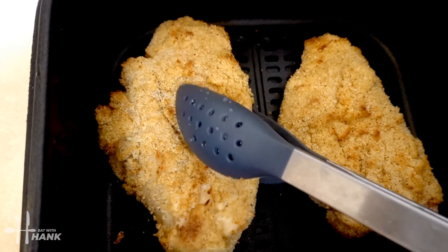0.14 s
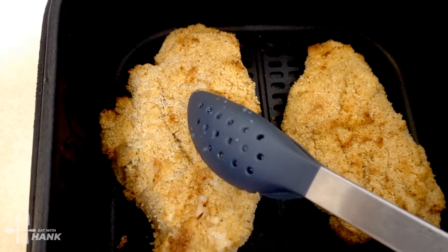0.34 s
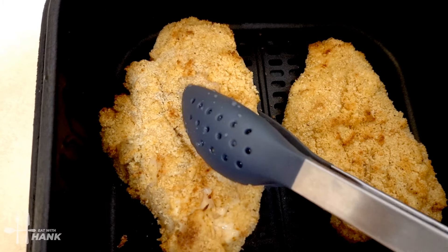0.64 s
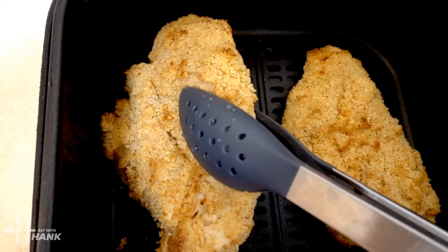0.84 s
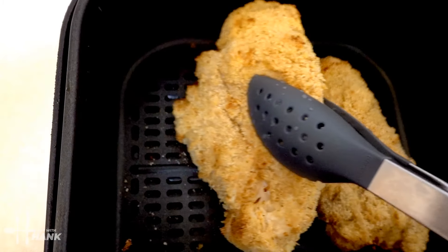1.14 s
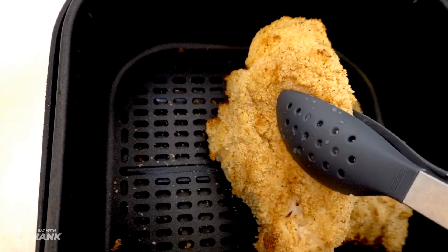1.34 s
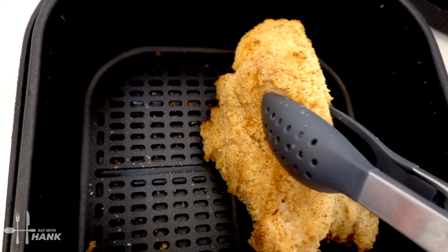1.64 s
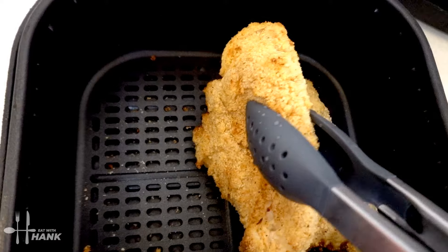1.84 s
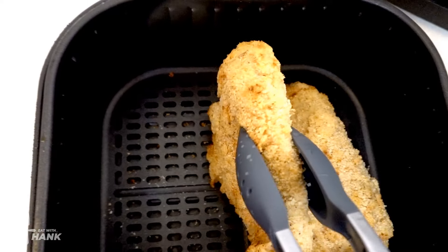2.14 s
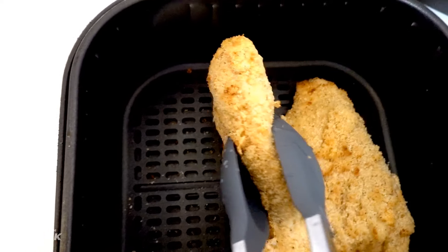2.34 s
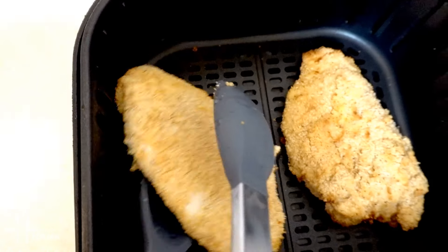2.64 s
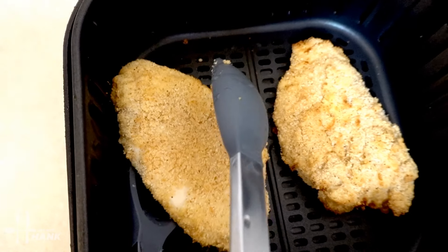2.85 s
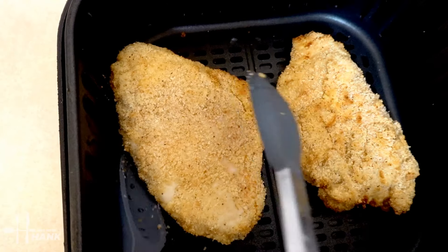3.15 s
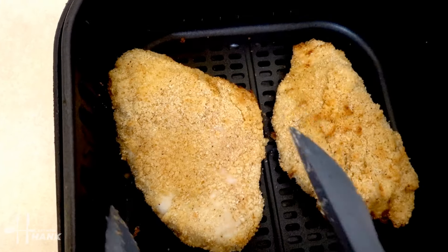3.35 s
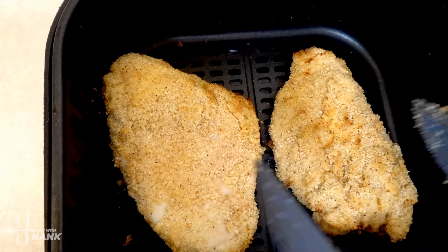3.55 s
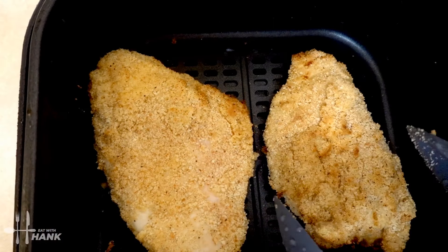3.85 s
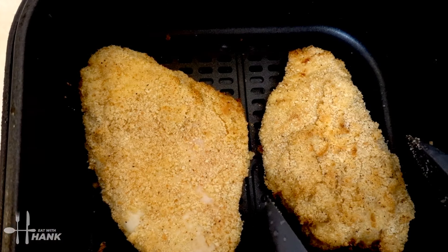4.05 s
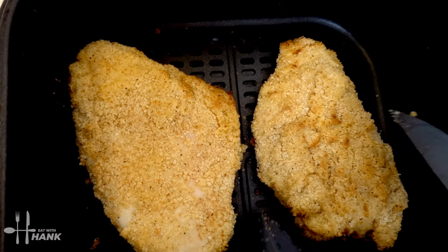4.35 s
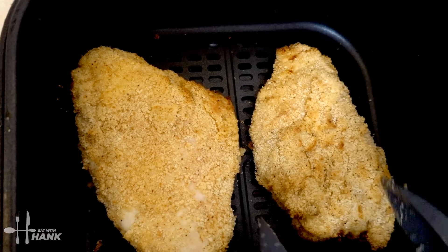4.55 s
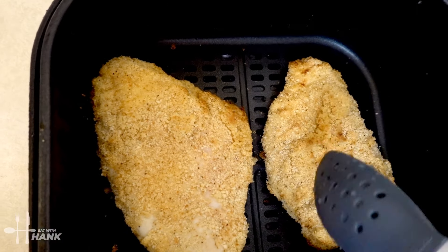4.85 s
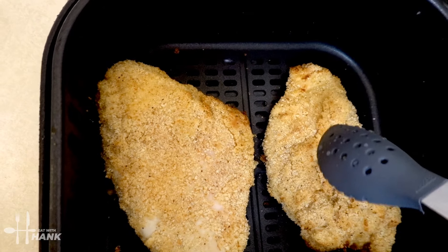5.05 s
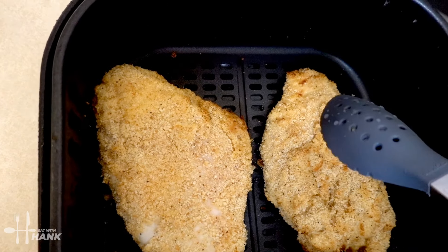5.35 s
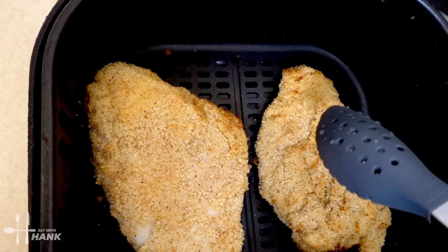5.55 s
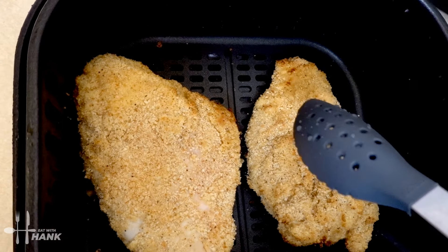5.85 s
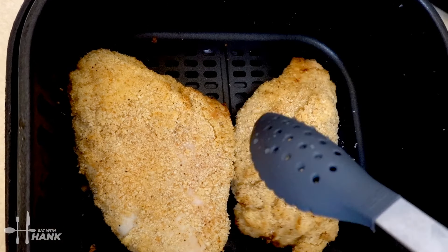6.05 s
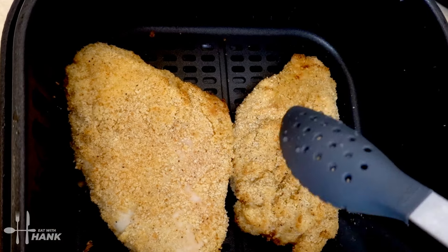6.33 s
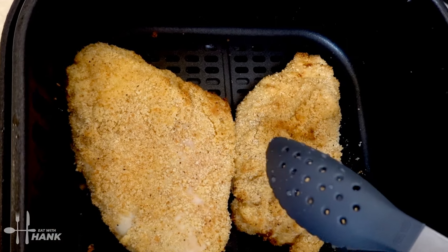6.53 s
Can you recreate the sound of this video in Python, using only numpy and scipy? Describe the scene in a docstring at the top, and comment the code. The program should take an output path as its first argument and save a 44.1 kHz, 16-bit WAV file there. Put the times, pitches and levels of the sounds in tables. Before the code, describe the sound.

Crunchy breaded meat slides over a metal grate and drops with a crack, then dull thuds, dry tong ticks and a short scraping drag.

```python
"""Breaded chicken is slid, lifted and flipped in an air fryer basket by silicone-tipped tongs, close by.
Bursts of tiny fractures make the crumbs crackle; the same kind of slips ring the grate and drag the silicone.
Knocks are short shaped noise, thuds, bumps and ticks are struck modes, and echoes add basket and kitchen.
A soft rustle of noise puffs sets in while the hand changes its grip; room air and a faint hum lie behind."""
import sys
import numpy as np
from scipy import signal
from scipy.fft import rfft, irfft
from scipy.io import wavfile
from scipy.ndimage import uniform_filter1d

SR = 44100
rng = np.random.default_rng(int(sys.argv[2]) if len(sys.argv) > 2 else 0)


def digitize_waveform(pressure):
    """Quantize a signal to 16-bit integers and store it at the path in sys.argv[1].

    Rows of a 2-D input are taken as channels; values are limited to [-1, 1].
    """
    field = np.atleast_2d(pressure).T
    bounded = np.clip(field, -1, 1)
    quanta = np.round(bounded * 32767).astype(np.int16)
    wavfile.write(sys.argv[1], SR, quanta)


N = 295029
T = np.arange(N) / SR  # time in seconds

# Strokes of the tongs and the meat.
# Each row: start in seconds, length in seconds, then three relative levels in dB:
# crumb crackle, scrape on the grate, rumble of shifting weight.
STROKES = [(.05, 0.013, -52, -50.5, -50.5), (.28, 0.13, -72, -70, -71.5), (.525, 0.027, -61.5, -58.5, -64),
           (.62, 0.38, -69, -67, -66), (1.0, .06, -70.5, -56, -74), (1.1, 0.15, -67, -52, -76),
           (1.56, 0.11, -79, -75, -65), (1.68, .2, -73.5, -77.5, -65.5), (1.95, 0.42, -84, -79, -71),
           (2.45, .13, -71.5, -68.5, -66.5), (2.695, 0.019, -51, -46, -60.5), (2.77, 0.085, -55, -53, -74),
           (2.865, .125, -51, -46, -64), (3.075, 0.0083, -59, -45.5, -49), (3.16, 0.078, -75, -80, -64),
           (5.6, 0.071, -63.5, -56, -61.5), (5.72, 0.066, -68, -61.5, -62.5), (5.99, 0.11, -57.5, -54, -82),
           (6.115, 0.085, -61, -43.5, -66), (6.325, 0.042, -75, -54.5, -54), (6.49, 0.045, -60, -55.5, -61)]
CRACKLE, SCRAPE, RUMBLE = 2, 3, 4  # which column of a stroke to play
STROKE_RISE_DB_PER_S, STROKE_FALL_DB_PER_S = 226, 240


def stroke_strength(column, fall_db_per_s=STROKE_FALL_DB_PER_S):
    """Each stroke builds up before its start, holds for its length, then dies away."""
    return gestures(STROKES, STROKE_RISE_DB_PER_S, fall_db_per_s, column)


# Crust snapping. Each row: start in seconds, relative level in dB, fading time (to 37 %) in seconds.
SNAPS = [(0.075, -40, 0.0037), (0.265, -48, 0.0017), (0.432, -45, 0.00091), (0.515, -47, 0.0022),
         (1.514, -56, 0.0063), (2.165, -56, 0.0039), (2.616, -42.5, 0.0051), (2.744, -25, 0.0035),
         (2.852, -34.5, 0.0023), (2.889, -41, 0.001), (2.982, -37, 0.0029), (3.072, -37.5, 0.0076),
         (5.19, -41, 0.0017), (5.533, -37, 0.00071)]
# Colour of the crackle. Each row: frequency in Hz, relative level in dB.
CRUMB_COLOUR = [(40, -40.5), (200, -7.5), (600, -1.5), (900, 5.5), (1400, 0.5), (2000, -4.5), (3300, 4.5),
                (4800, 4), (6300, 4), (10500, -1.5), (12800, -14.5), (15000, -15)]


def crumbs(effort):
    """Breading crackles under each stroke; now and then a piece of crust snaps."""
    crackle = grains(per_s=6000, spread_db=4.3, clump_db=3.2, clump_s=0.006)
    drive = crackle * effort * amp(6.5)
    t = T[:SR // 8]
    for start, db, fade_s in SNAPS:
        add(drive, start, amp(db) * np.exp(-t / fade_s) * rng.standard_normal(len(t)))
    tone = colour(CRUMB_COLOUR)
    return convolve(drive, tone / np.linalg.norm(tone))


def pops(effort):
    """Single crumbs break with a crisp pop, more loudly under a firm stroke."""
    breaks = grains(per_s=30, spread_db=3, clump_db=0, clump_s=1)
    return passed(breaks, 1500, "high") * effort * amp(3)


# Ringing of the grate.
# Each row: pitch in Hz, width in Hz (doubled in each of two passes), relative level in dB.
GRATE_RINGS = [(2450, 720, 2), (2500, 200, 6.5), (2734, 150, -3.5), (2910, 130, -2), (3155, 410, -9)]


def scrape():
    """Small slips ring the grate."""
    slips = grains(per_s=3000, spread_db=1.3, clump_db=3.8, clump_s=0.014)
    rung = np.zeros(N)
    for hz, width, db in GRATE_RINGS:
        rung += amp(db) * resonate_twice(slips, hz, 2 * width)
    return amp(1.5) * evened(rung) * stroke_strength(SCRAPE)


# Silicone dragging on the coating.
# Each row: start in seconds, length in seconds, final level in dB, swell in dB (a negative one fades),
# pitch in Hz, width of each of two resonances in Hz.
DRAGS = [(1.126, 0.18, -53.5, 7, 930, 148), (1.675, 0.17, -65, -2, 2330, 320),
         (6.103, .14, -43.5, 4, 726, 584), (6.324, 0.018, -43, 1, 895, 594)]


def drag():
    """Silicone sticks and slips in a hoarse tone whose level follows the tightening or easing grip."""
    slips = grains(per_s=2000, spread_db=3.8, clump_db=3.2, clump_s=0.012)
    out = np.zeros(N)
    for start, length, db, swell_db, hz, width in DRAGS:
        remaining = np.clip((start + length - T) / length, 0, 1)
        grip = amp(db - swell_db * remaining)
        tone = evened(resonate_twice(slips, hz, width))
        out += grip * tone * gesture(start, length, rise_db_per_s=500, fall_db_per_s=378)
    return out


# Silicone hissing over fine crumbs.
# Each row: start in seconds, length in seconds, level in dB, pitch in Hz.
FIZZES = [(0.56, 0.35, -65.5, 10000), (4.924, 0.18, -62.5, 14300), (5.197, .015, -58.5, 11200)]


def fizz():
    """Silicone brushes over the finest crumbs with a high hiss."""
    fine = grains(per_s=4600, spread_db=4.5, clump_db=3.6, clump_s=0.023)
    out = np.zeros(N)
    for start, length, db, hz in FIZZES:
        hiss = evened(resonate_twice(fine, hz, width=3500))
        out += amp(db) * hiss * gesture(start, length, rise_db_per_s=500, fall_db_per_s=200)
    return out


# Knocks on the basket. Each row: start in seconds, relative level in dB, length of the chatter in seconds.
KNOCKS = [(0.054, -43, 0.058), (.531, -39, 0.0038), (2.679, -34.5, 0.0032), (2.748, -15.5, 0.0036),
          (2.753, -28, 0.0043), (5.3139, -40, 0.0062), (6.084, -26.5, 0.013), (6.3173, -24.5, 0.0033)]
# Colour of a knock. Each row: frequency in Hz, relative level in dB.
KNOCK_COLOUR = [(30, -49.5), (100, -5), (220, -3), (500, -6), (850, 6), (1300, -8), (2000, 0), (2750, 9),
                (3700, -2), (5200, -2.5), (8000, -13.5), (16000, -29.5)]


def knocks():
    """A hard contact is a short chatter of crust and tong tip on the basket."""
    drive, t = np.zeros(N), T[:SR // 8]
    for start, db, length in KNOCKS:
        fade = (1 + t / length) * np.exp(-2 * t / length)
        add(drive, start, amp(db) * fade * rng.standard_normal(len(t)))
    tone = colour(KNOCK_COLOUR)
    return convolve(drive, tone / np.linalg.norm(tone))


# Colour of the shifting weight. Each row: frequency in Hz, relative level in dB.
WEIGHT_COLOUR = [(40, -35.5), (90, 2.5), (200, -2), (300, -6), (500, -6), (750, -12.5), (1200, -36.5),
                 (3000, -27.5)]


def shifting_weight():
    """The heavy meat rumbles, settles slowly and never lies quite still in the grip."""
    strength = np.maximum(stroke_strength(RUMBLE, fall_db_per_s=153), amp(-71.5))
    slips = grains(per_s=600, spread_db=3.3, clump_db=1.1, clump_s=0.035)
    return strength * evened(convolve(slips, colour(WEIGHT_COLOUR))[0])


# The pressed cutlet judders on the grate. Each row: start in seconds, length in seconds, level in dB.
JUDDERS = [(4.97, .15, -67.5), (5.17, 0.03, -55), (5.33, 0.04, -57), (6.11, .09, -51.5),
           (6.235, 0.019, -39), (6.32, 0.13, -57)]


def judder():
    """A stick-slip tone around 214 Hz, unsteady in pitch and strength."""
    pitch, strength = (evened(uniform_filter1d(rng.standard_normal(N), size=900)) for _ in range(2))
    turns = np.cumsum(214 * (1 + 0.07 * pitch)) / SR
    tone = evened(np.sin(2 * np.pi * turns) * amp(2.8 * strength))
    return gestures(JUDDERS, rise_db_per_s=800, fall_db_per_s=300) * tone


# Soft thuds through the fryer body.
# Each row: start in seconds, peak level in dB, hardness as the low-pass cutoff in Hz.
THUDS = [(0.5356, -46, 403), (0.761, -48.5, 418), (2.749, -29.5, 400), (2.768, -38.5, 350),
         (3.056, -41.5, 356), (3.097, -41.5, 457), (3.313, -49, 363), (3.697, -39.5, 182), (3.72, -38, 246),
         (3.751, -44, 250), (3.954, -33, 480), (3.961, -30, 453), (3.984, -38, 450), (4.016, -35, 298),
         (5.326, -45.5, 333), (6.093, -41, 493), (6.321, -46.5, 453)]
# Ringing modes of the fryer body. Each row: pitch in Hz, relative level in dB, time to fall 60 dB in seconds.
BODY_MODES = [(83, -0.5, 0.083), (130.2, -1.5, 0.28), (160.6, 0.5, 0.099), (238.4, -2, 0.096),
              (331.2, -7, 0.24), (439, -4.5, 0.19), (473, -2.5, 0.094), (594, -5.5, 0.18), (655, -4.5, 0.2),
              (724, -25, 0.11), (860, -16, 0.22), (974, -9.5, 0.43)]


def thuds():
    """A padded blow rings the hollow fryer, with a little scuffing noise."""
    out, t = np.zeros(N), T[:SR // 2]
    for start, db, hardness_hz in THUDS:
        dull_noise = passed(rng.standard_normal(len(t)), 1000, "low", order=1)
        scuff = evened(passed(dull_noise, 400, "high"))
        blow = ring(BODY_MODES) + amp(-12.5) * scuff * np.exp(-t / 0.023)
        blow = blow * (1 - np.exp(-t / 0.0048))  # a padded contact builds up gradually
        blow = passed(blow, hardness_hz, "low")  # soft blows are dull
        blow = passed(blow, 69, "high", order=4)  # a small box has no deep bass
        add(out, start, amp(db) * blow / abs(blow).max())
    return out


# Dry ticks of the tong hinge.
# Each row: start in seconds, relative level in dB, left minus right in dB.
TICKS = [(0.2888, -36, 10.5), (.673, -32, 8.5), (2.098, -56, -8), (2.1643, -46.5, -8.5),
         (3.325, -37.5, 9.5), (4.7767, -41, 18), (5.278, -46, -1), (5.427, -33, 4.5), (5.5775, -41, 15),
         (5.961, -33, 4), (5.978, -40.5, 17)]
# Ringing modes of the tongs. Each row: pitch in Hz, relative level in dB, time to fall 60 dB in seconds.
TONG_MODES = [(2277, -5.5, 0.021), (2950, -5, 0.014), (4140, -2.5, 0.0051), (5010, -3, 0.011),
              (7130, -10.5, 0.012)]
# One bright chink of the steel arm: start in seconds, relative level in dB.
CHINK = (5.1875, -30)
# Ringing modes of the steel arm. Each row: pitch in Hz, relative level in dB, time to fall 60 dB in seconds.
STEEL_MODES = [(3700, -10, 0.0089), (9070, -7, .015), (10670, 1, 0.02), (13800, -7, .012)]


def ticks():
    """The hinge ticks right beside the microphone; once the steel arm chinks."""
    out, t = np.zeros((2, N)), T[:SR // 2]
    for start, db, side_db in TICKS:
        snap = amp(-14.5) * rng.standard_normal(len(t)) * np.exp(-t / 0.0018)
        rung = ring(TONG_MODES, rng.random((len(TONG_MODES), 1)), scatter_db=2)
        tick = rung + passed(snap, 11800, "low")
        tick = passed(tick, 1730, "high") * (1 - np.exp(-t / 0.0001))
        add(out[0], start + 0.0001, amp(db + side_db / 2) * tick)  # left is slightly later
        add(out[1], start, amp(db - side_db / 2) * tick)
    chink_start, chink_db = CHINK
    chink = ring(STEEL_MODES, rng.random((len(STEEL_MODES), 1)))
    add(out, chink_start, amp(chink_db) * amp([[-12], [0]]) * chink)  # left is 12 dB weaker
    echoes = space(walls_db=-14, walls_t60=0.03, room_db=7, room_t60=0.41)
    return out + amp(-15) * convolve(out, echoes)


# Colour of the rubbing. Each row: frequency in Hz, relative level in dB.
RUSTLE_COLOUR = [(300, -12), (1200, -5), (1850, 5), (2150, 0.5), (2450, 4.5), (3300, 1.5), (3750, -0.5),
                 (4750, 0.5), (5500, -4.5), (7000, -1.5), (9000, -4), (12000, -7), (15000, -7)]
# Resonances that the rubbing excites. Each row: pitch in Hz, width in Hz, relative level in dB.
GRIP_RINGS = [(1810, 150, -4), (2375, 100, -3), (4710, 210, -7), (6970, 270, -4), (8730, 250, -7),
              (10440, 400, 0.5)]
# Extra colour of the rustle at the left port. Each row: frequency in Hz, relative level in dB.
RUSTLE_SHADE = [(500, -17), (1900, 2), (3200, 0), (3900, -8), (4800, 3.5), (5800, -7.5), (7200, -13),
                (9000, -11.5), (13000, -18)]
# Loudness of the rustle, which swells and then stays even. Each row: time in seconds, level in dB.
RUSTLE_LEVEL = [(3.5, -91), (3.72, -70.5), (3.98, -61), (4.4, -57.5), (4.68, -60.5), (6.69, -60.5)]


def rustle():
    """Fine rubbing near the microphone as the hand turns: tiny puffs, heard differently at each port."""
    rubs = grains(per_s=1500, spread_db=3.5, clump_db=2.04, clump_s=0.013)
    fade = np.exp(-1 / (0.0014 * SR))  # the power of a puff fades over 1.4 ms
    puffs = np.sqrt(signal.lfilter([1], [1, -fade], rubs ** 2))
    rubbing = convolve(diffuse(N) * puffs, colour(RUSTLE_COLOUR))
    rubbing = rubbing + sum(amp(db) * resonate(rubbing, hz, width) for hz, width, db in GRIP_RINGS)
    left, right = drifting(rubbing, depth_db=1.33)
    left = np.roll(convolve(left, colour(RUSTLE_SHADE))[0], 4)  # left is 4 samples later
    return np.array([left, right]) / right.std() * level(RUSTLE_LEVEL)


# Dull, low handling bumps of the camera.
# Each row: start in seconds, relative level in dB, time to fall 60 dB in seconds.
BUMPS = [(.012, -36.5, 0.12), (2.498, -37.5, 0.013), (2.755, -31.5, .05), (4.821, -40, 0.017)]


def handling_bumps():
    """Each handling bump of the camera is one low mode at 91.8 Hz that dies away."""
    out = np.zeros(N)
    for start, db, t60 in BUMPS:
        add(out, start, amp(db) * passed(ring([(91.8, 0, t60)]), 60, "high"))
    return out


# Colour of the room air. Each row: frequency in Hz, relative level in dB.
AIR_COLOUR = [(15, -23), (25, -13), (48, -24), (69, -1), (240, -17), (523, -15), (567, -13), (684, -19.5),
              (1080, -28), (1800, -29.5), (2230, -24), (3530, -41.5), (10100, -58), (15500, -57.5)]


def kitchen():
    """Quiet room air as coloured noise, and an appliance hum with a steady and a wavering part."""
    air = evened(convolve(diffuse(N), colour(AIR_COLOUR)))
    hum = evened(np.sin(2 * np.pi * 59.5 * T))
    waver = evened(resonate(resonate(rng.standard_normal(N), 66, 4.9), 51.6, 3.9))
    return amp(-69) * air + amp(-69) * hum + amp(-75.5) * waver


# Level at the left port, which faces away. Each row: frequency in Hz, level in dB.
SHADE = [(220, -0.5), (600, -2), (1000, -6), (1700, -0.5), (2600, -2.5), (5000, -6.5), (7000, -15),
         (10000, -15), (15000, -23)]


def space(walls_db, walls_t60, room_db, room_t60, size=200):
    """Direct sound, reaching the left port 3 samples late, then the basket walls and the kitchen."""
    t = T[:SR // 2]
    response = np.zeros((2, len(t)))
    response[0, 3] = response[1, 0] = 1
    for db, t60 in (walls_db, walls_t60), (room_db, room_t60):
        fade = np.exp(-np.log(1000) * t / t60) * (1 - np.exp(-20 * t / t60))
        tail = diffuse(len(t)) * fade
        response += amp(db) * tail / np.linalg.norm(tail[1])
    left, right = balanced(response, size)
    return np.array([convolve(left, colour(SHADE))[0, :len(right)], right])


def balanced(response, size):
    """Many reflections ripple the spectrum finely but leave its broad shape flat."""
    power = uniform_filter1d(np.mean(abs(rfft(response)) ** 2, axis=0), size)
    hz = np.fft.rfftfreq(response.shape[1], 1 / SR)
    return convolve(response, colour(np.c_[hz + 1, -10 * np.log10(power)]))


# Likeness of diffuse sound at the two ports. Each row: frequency in Hz, likeness from 0 to 1.
LIKENESS = [(150, 0.99), (600, 0.89), (1000, 0.3), (2500, 0.28), (5000, 0)]


def diffuse(size):
    """Noise at both ports: alike in the bass, unrelated in the treble."""
    a, b = rfft(rng.standard_normal((2, size)))
    same = np.clip(read(LIKENESS, np.fft.rfftfreq(size, 1 / SR)), 0, 1)
    return irfft(np.array([same * a + np.sqrt(1 - same ** 2) * b, a]), size)


def grains(per_s, spread_db, clump_db, clump_s):
    """Tiny fractures of uneven size that come in clumps."""
    sizes = amp(spread_db * np.minimum(rng.exponential(1, N), 4)) * rng.choice([-1, 1], N)
    clumps = np.interp(T / clump_s, np.arange(N), rng.standard_normal(N))
    happens = rng.random(N) < per_s / SR
    return evened(sizes * happens * amp(clump_db * clumps))


def gesture(start, length, rise_db_per_s, fall_db_per_s):
    """Gain of one movement: attack up to its start, hold for its length, release."""
    early, late = np.maximum(start - T, 0), np.maximum(T - start - length, 0)
    return amp(-rise_db_per_s * early - fall_db_per_s * late)


def gestures(rows, rise_db_per_s, fall_db_per_s, column=2):
    """Gain of a table of movements, at the strengths in one dB column; the strongest leads."""
    gains = [amp(row[column]) * gesture(row[0], row[1], rise_db_per_s, fall_db_per_s) for row in rows]
    return np.max(gains, axis=0)


def ring(modes, phases=0, scatter_db=0):
    """Modes struck by one blow, peak 1; the point of contact shifts their strengths."""
    t = T[:SR // 2]
    hz, db, t60 = np.transpose(modes)[:, :, None]
    db = db + scatter_db * rng.standard_normal(db.shape)
    waves = np.sin(2 * np.pi * (hz * t + phases))
    sound = np.sum(amp(db - 60 * t / t60) * waves, axis=0)
    return sound / abs(sound).max()


def resonate(x, hz, width):
    """A resonance of gain 1: shift its pitch to zero, smooth, and shift back."""
    turn = np.exp(2j * np.pi * np.cumsum(hz * np.ones(N)) / SR)
    r = np.exp(-np.pi * width / SR)
    return 2 * (turn * signal.lfilter([1 - r], [1, -r], x / turn + 1e-18)).real


def resonate_twice(x, hz, width):
    """Two equal resonances in a row fall off more steeply around the pitch."""
    return resonate(resonate(x, hz, width), hz, width)


def drifting(x, depth_db):
    """The colour wanders in patches as the point of contact moves."""
    z = signal.stft(x, nperseg=512)[2]
    patches = uniform_filter1d(rng.standard_normal(z.shape[-2:]), size=14, axis=0)  # across frequency
    patches = uniform_filter1d(patches, size=22, axis=1)  # across time
    return signal.istft(z * amp(depth_db * evened(patches)), nperseg=512)[1][..., :N]


def colour(points, size=4096):
    """Causal impulse response with the given spectrum."""
    log_gain = np.log(amp(read(points, abs(np.fft.fftfreq(size, 1 / SR)))))
    return np.fft.ifft(np.exp(np.conj(signal.hilbert(log_gain)))).real[:size // 2]


def passed(x, hz, kind, order=2):
    """Low-pass or high-pass filter."""
    return signal.sosfilt(signal.butter(order, min(hz, SR / 3), kind, fs=SR, output="sos"), x)


def convolve(x, response):
    """Let every sample of x set off the response."""
    return signal.oaconvolve(np.atleast_2d(x), np.atleast_2d(response), axes=1)[:, :N]


def add(mix, start, sound):
    """Lay a sound into the mix from its start in seconds."""
    part = mix[..., max(round(start * SR), 0):][..., :sound.shape[-1]]
    part += sound[..., :part.shape[-1]]


def level(rows):
    """Gain that follows a dB curve, silent outside it."""
    s, db = np.transpose(rows)
    return amp(np.interp(T, s, db, left=-np.inf, right=-np.inf))


def read(points, hz):
    """Read a frequency table between its points, on a logarithmic frequency scale."""
    f, value = np.transpose(points)
    return np.interp(np.log(hz + 1), np.log(f), value)


def amp(db):
    """Turn dB into an amplitude factor."""
    return 10 ** (np.asarray(db) / 20)


def evened(x):
    """Scale to an average (RMS) level of 1."""
    return x / np.sqrt(np.mean(x ** 2) + 1e-20)


def scene():
    """Sliding, knocks and thuds sound in the basket; the hinge and the grip are next to the microphone."""
    basket = space(walls_db=2.5, walls_t60=0.026, room_db=-6, room_t60=0.42)
    grate = space(walls_db=3, walls_t60=0.044, room_db=-4.5, room_t60=0.18)
    low_echoes = space(walls_db=-17.5, walls_t60=0.11, room_db=-10, room_t60=0.39, size=20)
    effort = stroke_strength(CRACKLE)
    sliding = drifting(crumbs(effort) + fizz() + scrape(), depth_db=0.84) + drag()
    hits = knocks() + pops(effort)
    low_sounds = shifting_weight() + judder() + thuds() + handling_bumps()
    echoing = convolve(sliding, basket) + convolve(hits, grate) + convolve(low_sounds, low_echoes)
    return echoing + ticks() + rustle() + kitchen()


def record(dry):
    """The recorder's band limit: a steep low-pass at 15850 Hz."""
    low_pass = signal.firwin(511, 15850, window=("kaiser", 9), fs=SR)
    return signal.oaconvolve(dry, low_pass[None], "same")


dry = scene()
out = record(dry)
digitize_waveform(out)
```